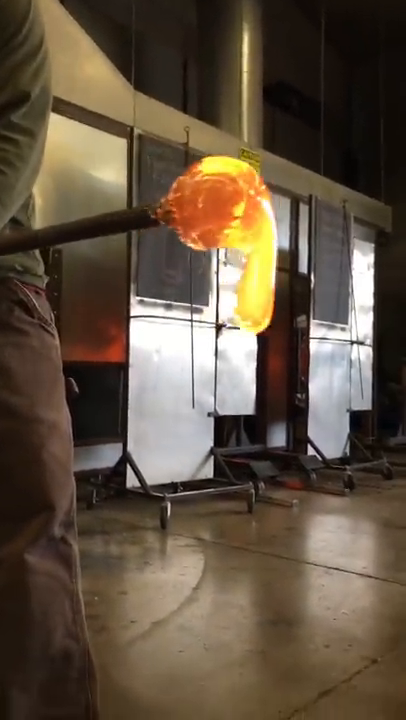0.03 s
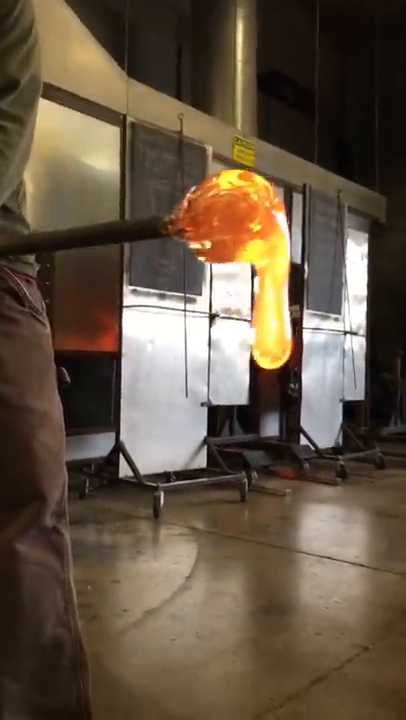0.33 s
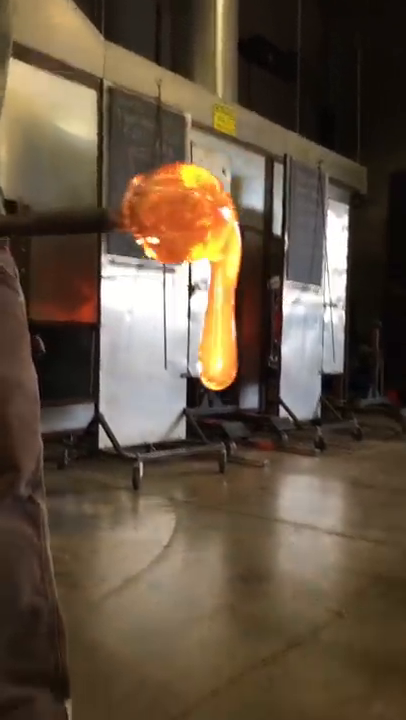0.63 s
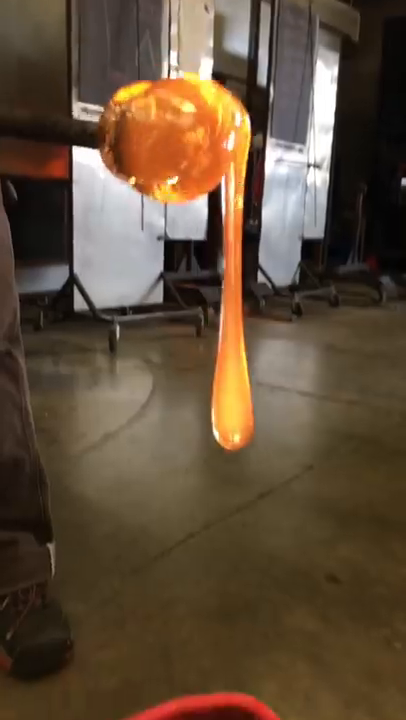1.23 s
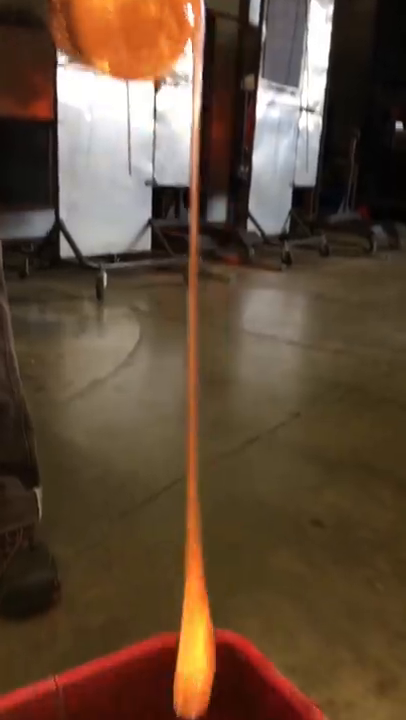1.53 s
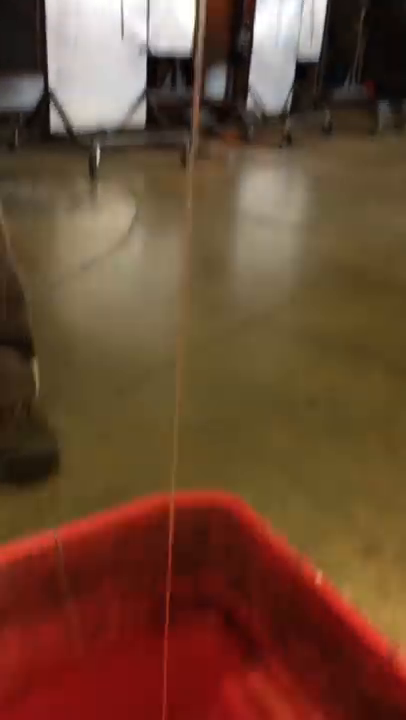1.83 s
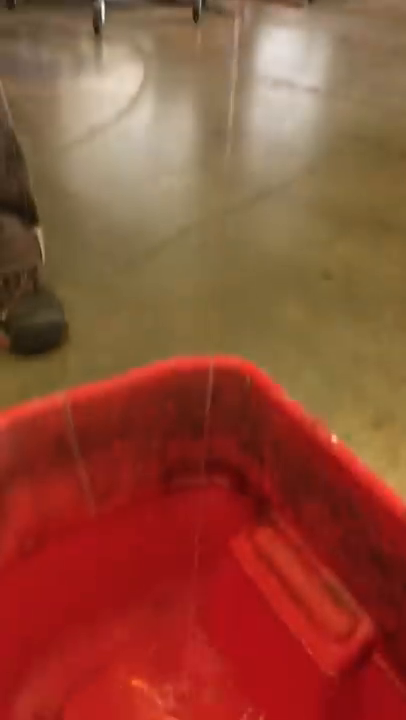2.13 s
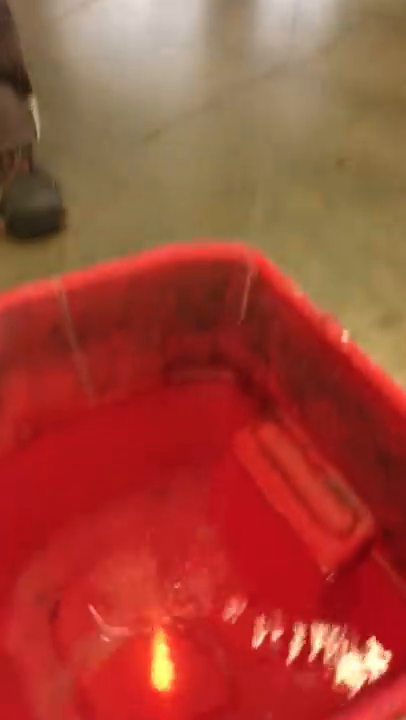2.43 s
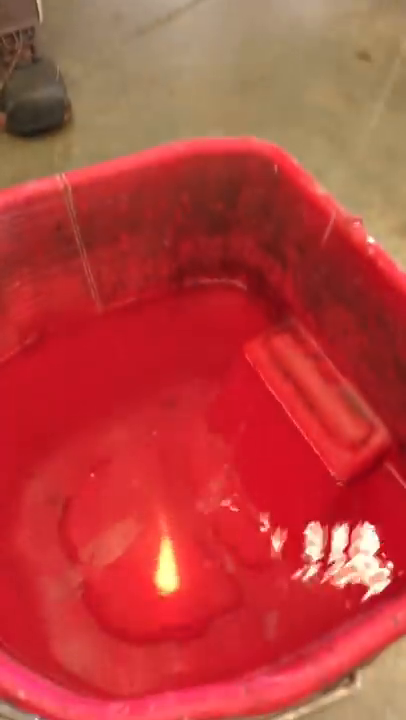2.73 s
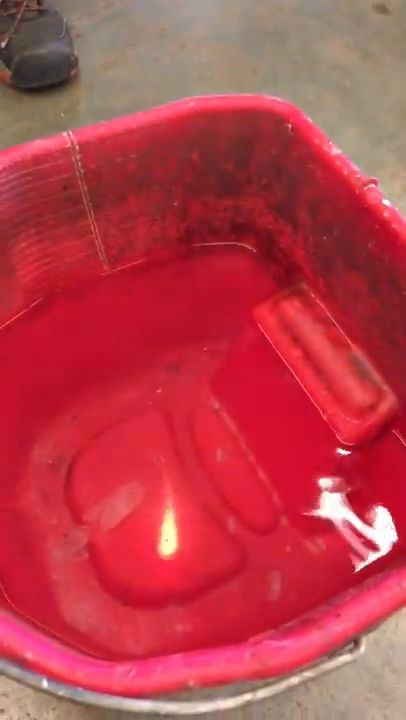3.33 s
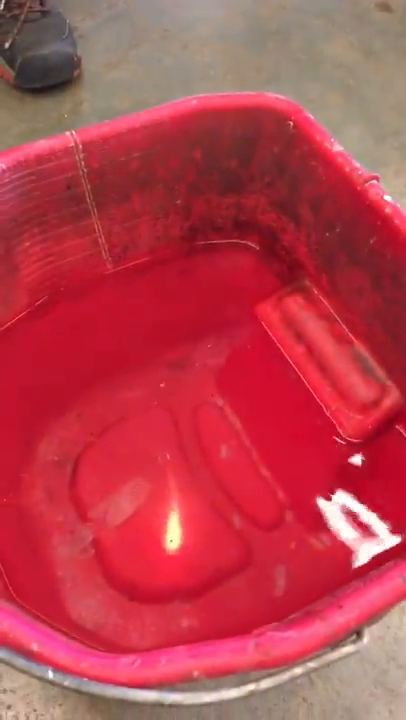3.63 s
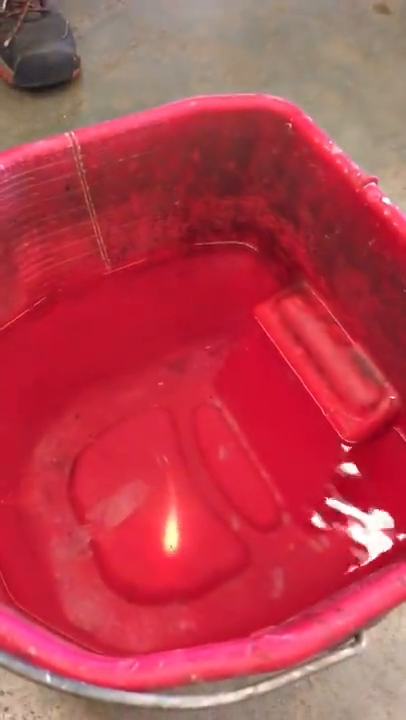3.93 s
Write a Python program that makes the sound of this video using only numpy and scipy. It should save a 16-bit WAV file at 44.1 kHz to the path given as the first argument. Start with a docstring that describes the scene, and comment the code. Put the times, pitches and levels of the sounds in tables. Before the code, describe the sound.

Molten glass drops into a plastic bucket of water with a brief twang and a plop, then boils, hisses and cracks in sharp clicks. The water slops on, heard close, with a workshop furnace rumbling throughout.

```python
"""Furnace burners rumble and a blower hums in a glass workshop, and go on throughout.
A gob of molten glass drops on its thread into a plastic bucket of water. Bending waves twang down
the thread, and the gob plops as its air cavity rings. Water boils, hisses and whistles on the hot
surface, the chilled glass cracks in sharp clicks, and the water slops on."""
import sys
import numpy as np
from scipy import signal
from scipy.fft import rfft, irfft
from scipy.io import wavfile
from scipy.ndimage import uniform_filter1d, map_coordinates

SR = 44100
rng = np.random.default_rng(int(sys.argv[2]) if len(sys.argv) > 2 else 0)


def waveform_to_disk(signal):
    """Save audio, clipped to [-1, 1], as 16-bit WAV at the path in sys.argv[1]."""
    frames = np.transpose(np.atleast_2d(signal))
    scaled = np.clip(frames, -1, 1) * 32767
    samples = np.round(scaled).astype(np.int16)
    wavfile.write(sys.argv[1], SR, samples)


N = 176400

# Spectrum of cracks and crackle. Each row: frequency in Hz, level in dB.
CRACK_SPECTRUM = [(200, -17.5), (600, 0), (1200, -4), (2100, 4.5), (3000, -5), (4200, -5), (8000, -11),
                  (16000, -17)]


def amp(db):
    return 10 ** (np.asarray(db) / 20)


def unit_rms(x):
    return x / np.sqrt(np.mean(x ** 2) + 1e-20)


def spectrum_db(spectrum, hz):
    """Interpolate (Hz, dB) rows on a log frequency axis."""
    row_hz, row_db = np.transpose(spectrum)
    return np.interp(np.log(hz + 1), np.log(row_hz + 1), row_db)


def envelope(rows):
    """Gain per sample from (s, dB) rows."""
    return amp(np.interp(np.arange(N) / SR, *np.transpose(rows)))


def wobble(knots_per_s):
    """Smooth random curve."""
    knots = rng.standard_normal(int(N * knots_per_s / SR) + 4)
    return map_coordinates(knots, [np.arange(N) * knots_per_s / SR])


def add(out, start_s, x):
    i = round(start_s * SR)
    out[i:i + len(x)] += x[:len(out) - i]


def pulse(spectrum, tilt_db_per_oct=0, size=4096):
    """Minimum-phase click of unit energy."""
    hz = np.fft.rfftfreq(size, 1 / SR)
    db = spectrum_db(spectrum, hz) + tilt_db_per_oct * np.log2(hz / SR + 1 / 2 ** 7)
    cepstrum = irfft(np.log(amp(db)))
    cepstrum[1:size // 2] *= 2
    cepstrum[size // 2 + 1:] = 0
    click = irfft(np.exp(rfft(cepstrum)))
    return click / np.linalg.norm(click)


def noise(spectrum):
    """Coloured noise, rms 1."""
    gain = amp(spectrum_db(spectrum, np.fft.rfftfreq(N, 1 / SR)))
    return unit_rms(irfft(rfft(rng.standard_normal(N)) * gain, N))


def burst(t60_s):
    """Decaying white noise."""
    t = np.arange(SR // 2) / SR
    return rng.standard_normal(len(t)) * amp(-60 * t / t60_s)


def ring(hz, t60_s, rise_s):
    """Damped sine."""
    t = np.arange(SR // 2) / SR
    return np.sin(2 * np.pi * hz * t) * amp(-60 * t / t60_s) * (1 - np.exp(-t / rise_s))


def pops(per_s, spectrum, spread_db):
    """Tiny bursting bubbles of uneven size, rms 1."""
    sizes = amp(spread_db * np.clip(rng.standard_normal(N), -2, 2)) * rng.choice([-1, 1], N)
    impulses = sizes * (rng.random(N) < per_s / SR)
    return unit_rms(signal.fftconvolve(impulses, pulse(spectrum))[:N])


def patchy(x, depth_db=2, size=256):
    """Brief spectral peaks and dips as bubbles of like size come and go, rms 1."""
    frames = signal.stft(x, nperseg=size)[2]
    patches = uniform_filter1d(rng.standard_normal(frames.shape), size=3, axis=0)
    patches = uniform_filter1d(patches, size=7, axis=1)
    frames = frames * amp(depth_db * unit_rms(patches))
    return unit_rms(signal.istft(frames, nperseg=size)[1][:N])


def furnace(rumble_db=-24, roar_db=-36.5):
    """Burner rumble and roar, with unsteady blower and burner tones."""
    # Each row: frequency in Hz, relative density in dB.
    rumble_spectrum = [(20, -20), (32, -21), (43, -8.5), (54, -1.5), (62, 3), (74, -8), (88, 0.5),
                       (101, -5.5), (128, -4), (152, -12.5), (185, -14.5), (250, -20.5), (340, -23.5),
                       (480, -62.5)]
    roar_spectrum = [(200, -14.5), (390, 0.5), (530, -2), (660, -0.1), (725, -5), (850, -2.5), (1100, -4),
                     (1380, -0.6), (1640, -5.5), (1810, -11), (2000, -5), (2180, -7), (2300, -15),
                     (2600, -11.5), (2900, -20), (3200, -16), (3750, -22), (4200, -21.5), (4900, -29.5),
                     (5600, -25.5), (7500, -34), (9300, -36.5), (10400, -48), (11500, -35.5), (13800, -34),
                     (16000, -41)]
    # Each row: frequency in Hz, rms level in dB, unsteadiness from 0 to 1.
    tones = [(62, -31, .6), (128.5, -33, .5), (292.2, -36.5, .12), (679, -56, .5), (769, -54, .3),
             (1350, -52, .6), (1646, -55.5, .6), (1968, -60, .6)]
    t = np.arange(N) / SR
    hum = np.zeros(N)
    for hz, db, shake in tones:
        flutter = 1 - shake + shake * (wobble(9.9) + 1j * wobble(9))
        hum += amp(db) * unit_rms(np.real(flutter * np.exp(2j * np.pi * hz * t)))
    rumble = amp(rumble_db) * noise(rumble_spectrum)
    roar = amp(roar_db + 0.43 * wobble(5.8)) * noise(roar_spectrum)
    return hum + rumble + roar


def ripples(per_s=900, low_hz=282, high_hz=4510, t60_cycles=19.6, pitch_rise=.15, wash_db=-0.5):
    """Small bubbles rising in pitch as they fade, over a noise wash, rms 1."""
    # Each row: frequency in Hz, gain in dB.
    slop_spectrum = [(60, -45), (200, -12.5), (350, 4), (520, -0.5), (750, -5.5), (950, -4), (1120, -0.5),
                     (1270, -11), (1750, -8), (2150, -12), (2400, -16), (3000, -20.5), (3400, -20),
                     (5000, -31.5), (9000, -39.5), (16000, -76)]
    count = round(per_s * N / SR)
    when, pitch, size_rank = rng.random((count, 3)).T[:, :, None]
    hz = low_hz * (high_hz / low_hz) ** pitch
    offsets = np.arange(SR // 40)
    age = hz * offsets / SR / t60_cycles  # 1 at 60 dB down
    gain = hz * amp(-4 * np.log(np.maximum(size_rank, 1 / 20)))
    cycles = t60_cycles * age * (1 + pitch_rise * age / 2)
    grains = gain * np.sin(2 * np.pi * cycles) * amp(-60 * age)
    positions = (when * N).astype(int) + offsets
    swarm = np.bincount(positions.ravel(), grains.ravel(), N)[:N]
    swarm = unit_rms(signal.fftconvolve(swarm, pulse(slop_spectrum))[:N])
    return unit_rms(swarm + amp(wash_db) * noise(slop_spectrum))


def water(lap_t60_s=0.061, bubble_t60_cycles=23, bubble_gain_db=5.0):
    """Water slops and laps at the bucket's sides; a few bubbles ring."""
    # Each row: time in seconds, level in dB.
    slop_levels = [(1.83, -90), (1.86, -46), (2.0, -35.5), (2.3, -29), (2.75, -32), (2.9, -29.5),
                   (3.15, -31.5), (3.38, -33), (3.5, -30), (3.7, -34), (3.93, -31.5), (4, -35.5)]
    laps = [(2.158, -19), (2.188, -27), (2.237, -26), (2.561, -23), (2.754, -19), (3.001, -32),
            (3.133, -23.5), (3.28, -21), (3.463, -26), (3.625, -24.5), (3.752, -24.5), (3.813, -24),
            (3.861, -29.5), (3.94, -19)]
    # Each row: frequency in Hz, level in dB.
    lap_spectrum = [(220, -29), (420, 5.5), (650, 6.5), (850, -1.5), (1120, 1), (1350, -10), (1800, -3.5),
                    (2500, -18), (5000, -28.5), (12000, -50)]
    # Each row: start in seconds, relative level in dB, frequency in Hz.
    bubbles = [(2.833, -17, 359), (3.132, -17, 1110), (3.753, -18, 960), (3.925, -15, 1160),
               (3.956, -22, 429)]
    out = envelope(slop_levels) * amp(1.34 * wobble(35)) * ripples()
    for start_s, db in laps:
        add(out, start_s, amp(db) * signal.fftconvolve(burst(lap_t60_s), pulse(lap_spectrum)))
    for start_s, db, hz in bubbles:
        add(out, start_s, amp(db + bubble_gain_db) * ring(hz, bubble_t60_cycles / hz, rise_s=0.0018))
    return out


def squeals(width_hz=520):
    """Brief, breathy whistles of steam and glass, most sliding down."""
    # Each row: start in seconds, length in seconds, level in dB, initial pitch in Hz, glide in octaves.
    whistles = [(1.777, 0.18, -48, 7300, -0.035), (1.934, .02, -39, 12600, 0),
                (2.54, .014, -28, 15000, -0.55), (2.665, 0.051, -35, 3640, -.1),
                (3.531, 0.028, -37, 6700, -.03)]
    out = np.zeros(N)
    for start_s, length_s, db, hz, glide_oct in whistles:
        t = np.arange(round(length_s * SR)) / SR
        flutter = (wobble(width_hz) + 1j * wobble(width_hz))[:len(t)]
        cycles = np.cumsum(hz * 2 ** (glide_oct * t / length_s)) / SR
        whistle = unit_rms(np.real(flutter * np.exp(2j * np.pi * cycles)))
        add(out, start_s, amp(db) * whistle * signal.windows.tukey(len(t), .5))
    return out


def boil(pops_per_s=2200, crackle_per_s=150, crackle_db=-7.5):
    """Water boils on the hot glass: coarse pops and sharp crackle."""
    # Each row: time in seconds, level in dB.
    boil_levels = [(1.83, -90), (1.85, -48), (1.92, -37), (1.97, -32.5), (2.02, -24.5), (2.14, -25),
                   (2.2, -31.5), (2.31, -36.5), (2.4, -34), (2.5, -26.5), (2.57, -31), (2.62, -32),
                   (2.69, -35), (2.76, -42), (2.85, -54)]
    # Each row: frequency in Hz, level in dB.
    boil_spectrum = [(200, -21), (380, -2), (800, -4.5), (1150, -0.5), (1600, -4), (2300, 1.5),
                     (2950, -4.5), (3600, -5.5), (5000, -12), (8000, -27), (16000, -30)]
    crackle = amp(crackle_db) * pops(crackle_per_s, CRACK_SPECTRUM, spread_db=2.5)
    gain = envelope(boil_levels) * amp(1.2 * wobble(60))
    return gain * (patchy(pops(pops_per_s, boil_spectrum, spread_db=1.5)) + crackle)


def steam(pops_per_s=6500):
    """Fine fizz on the hot surface, then one late spit."""
    # Each row: time in seconds, level in dB.
    fizz_levels = [(1.76, -90), (1.78, -51), (1.865, -50), (1.89, -36), (1.93, -43), (1.95, -29),
                   (1.965, -43), (2.08, -32.5), (2.2, -41), (2.32, -39.5), (2.39, -30), (2.55, -29.5),
                   (2.62, -31.5), (2.7, -34), (2.77, -60), (2.95, -68), (3.1, -88)]
    spit_levels = [(3.46, -90), (3.495, -44), (3.52, -35.5), (3.548, -33), (3.562, -54), (3.6, -85)]
    # Each row: frequency in Hz, level in dB.
    fizz_spectrum = [(1000, -36), (3000, -5), (4450, 5.5), (5000, -0.5), (6600, 1.5), (7600, -3.5),
                     (9000, 2.5), (10300, -4.5), (11300, -1), (14000, -5.5), (16000, -7)]
    spit_spectrum = [(1000, -15), (3000, -1), (5200, 2), (5900, -1), (6600, 6), (7700, -2), (8500, -8),
                     (9500, -1), (10500, -9), (11500, -1), (13300, -2), (16000, -14)]
    fizz_gain = envelope(fizz_levels) * amp(1.3 * wobble(50))
    fizz = fizz_gain * patchy(pops(pops_per_s, fizz_spectrum, spread_db=6.5))
    spit = envelope(spit_levels) * patchy(pops(pops_per_s, spit_spectrum, spread_db=4))
    return fizz + spit


def thread(scatter_db=-1.5, scatter_t60_s=0.016):
    """Bending waves run down the thin glass, treble first: fast falling chirps, partly scattered."""
    # Each row: start in seconds, level in dB, delay at 1 kHz in seconds, dispersion exponent,
    # tilt in dB per octave.
    twangs = [(1.769, -23, .03, 2, -22), (1.7668, -18.5, .02, .5, 1.5), (1.768, -17, .026, .5, 13)]
    # Each row: frequency in Hz, level in dB.
    thread_spectrum = [(1500, -44), (2050, -3), (2400, -1), (3300, 0), (7500, 1), (10000, -7), (14000, -5),
                       (16000, -14)]
    out = np.zeros(N)
    hz = np.fft.rfftfreq(4096, 1 / SR)
    for start_s, db, delay_s, dispersion, tilt in twangs:
        arrival_s = delay_s / np.maximum(hz / 1000, 1) ** dispersion
        lag_cycles = np.cumsum(arrival_s) * hz[1]
        magnitude = amp(spectrum_db(thread_spectrum, hz) + tilt * np.log2(1 + hz / 1000))
        chirp = irfft(magnitude * np.exp(-2j * np.pi * lag_cycles))
        scatter = burst(scatter_t60_s)
        scatter *= amp(scatter_db) / np.linalg.norm(scatter)
        scatter[0] = 1  # direct path
        add(out, start_s, amp(db) * signal.fftconvolve(chirp / np.abs(chirp).max(), scatter))
    return out


def plop(impact_s=1.8348, slap_db=-13, thud_db=-14):
    """The gob slaps the surface, the air cavity rings and the bucket thuds."""
    # Each row: frequency in Hz, level in dB.
    slap_spectrum = [(300, -11), (1000, 1.5), (2500, -1.5), (3700, -3.5), (5000, -12.5), (15000, -27)]
    # Entry, cavity closure, last gulp.
    # Each row: start in seconds, level in dB, pitch factor, tilt in dB per octave.
    stages = [(1.8363, -8, 1.024, 5.6), (1.8409, -4, 1, -3.5), (1.8655, -16, 0.876, -11)]
    # Each row: base frequency in Hz, relative level in dB, T60 in seconds.
    cavity_modes = [(405.5, -3, 0.064), (471, 2.1, 0.064), (546, -2, 0.047), (932, -1.6, 0.032),
                    (1065, -0.2, 0.021), (1945, -19.5, 0.037)]
    out = np.zeros(N)
    add(out, impact_s, amp(slap_db) * signal.fftconvolve(burst(t60_s=0.04), pulse(slap_spectrum)))
    for start_s, db, pitch, tilt in stages:
        for hz, mode_db, t60_s in cavity_modes:
            gain = amp(db + mode_db + tilt * np.log2(hz / cavity_modes[0][0]))
            add(out, start_s, gain * ring(hz * pitch, t60_s, rise_s=0.001))
    add(out, impact_s, amp(thud_db) * ring(hz=66, t60_s=0.21, rise_s=0.033))
    return out


def bucket(x, tail_db=-4, t60_s=0.029):
    """Echoes between the sides, and a short tail dulled by plastic and water."""
    # Each row: nominal delay in seconds, gain.
    wall_echoes = [(.0008, 0.71), (.0012, 0.35), (.0029, -.35)]
    # Each row: frequency in Hz, level in dB.
    tail_spectrum = [(500, 0), (2500, -0.5), (6000, -7), (16000, -13)]
    response = signal.fftconvolve(burst(t60_s), pulse(tail_spectrum))
    response *= amp(tail_db) / np.linalg.norm(response)
    response[0] = 1  # direct path
    for delay_s, gain in wall_echoes:
        add(response, delay_s * rng.uniform(.93, 1.07), gain * np.hanning(5) / 2)
    return signal.fftconvolve(x, response)[:N]


def cracks():
    """The chilled glass cracks, each time one sharp click inside the bucket."""
    # Each row: start in seconds, peak before echoes in dB, tilt in dB per octave.
    fractures = [(1.8785, -27, 4), (1.8995, -24, 7), (1.9385, -22, 8), (1.9495, -16, 1), (2.039, -16, -5),
                 (2.0569, -12, -1.5), (2.0761, -13, 2), (2.1018, -11, -4), (2.1379, -7.5, -2),
                 (2.157, -3.5, 4), (2.1601, -2, -0.5), (2.1894, -9, -4), (2.2055, -12, -2),
                 (2.223, -5.5, 0.5), (2.239, -5.5, -4.5), (2.258, -11, 1), (2.269, -8, 5), (2.444, -5, 5),
                 (2.456, -9.5, -3.5), (2.502, -7, 1), (2.5198, 0, 0.5), (2.5627, -2, 1), (2.5726, 6.5, 2),
                 (2.6098, -10, 1), (2.639, 7.5, 2), (2.655, 4, 0.5), (2.7298, -9.5, 4), (2.8305, -24, 5),
                 (2.849, -25, 0), (3.135, -19, 1), (3.2638, -15.5, 0), (3.5126, -10, 1.5), (3.5273, -16, 1),
                 (3.5503, -8, 6), (3.5627, -17, 1), (3.6045, -27, 9), (3.8635, -25, 2), (3.9405, -25, 3)]
    out = np.zeros(N)
    for start_s, db, tilt in fractures:
        click = pulse(CRACK_SPECTRUM, tilt)
        add(out, start_s, amp(db) * bucket(click / np.abs(click).max()))
    return out


def scene(room_db=-15.5):
    """Close bucket, faint workshop reverb, furnace behind; mono."""
    near = thread() + plop() + boil() + steam() + squeals() + cracks() + water()
    tail = burst(t60_s=0.43)
    room = signal.fftconvolve(near, tail / np.linalg.norm(tail))[:N]
    return (near + amp(room_db) * room + furnace())[None]


def record(dry, ceiling=1.3, cutoff_hz=15900):
    """Soft clip, then low-pass."""
    clipped = dry / (1 + np.abs(dry / ceiling) ** 6) ** (1 / 6)
    lowpass = signal.ellip(10, .05, 60, cutoff_hz, fs=SR, output="sos")
    return signal.sosfiltfilt(lowpass, clipped, padlen=4096)


dry = scene()
out = record(dry)
waveform_to_disk(out)
```